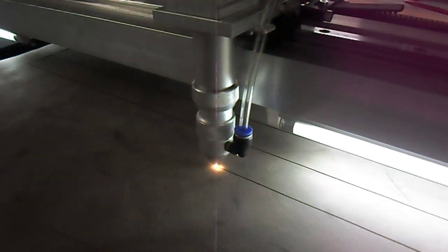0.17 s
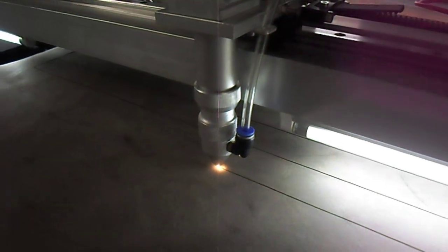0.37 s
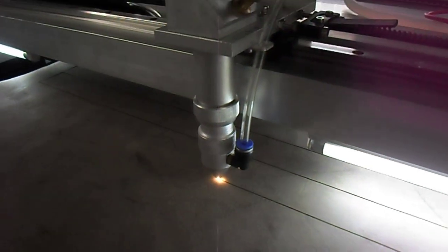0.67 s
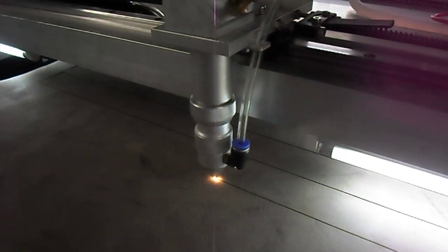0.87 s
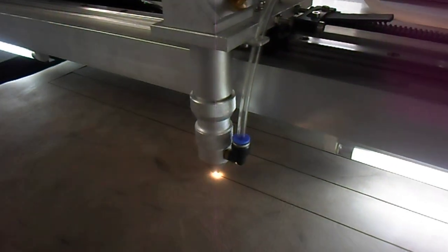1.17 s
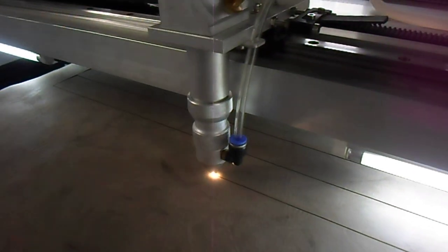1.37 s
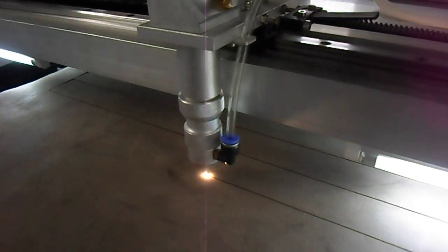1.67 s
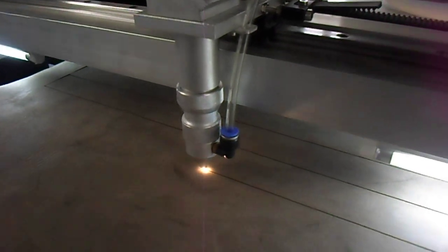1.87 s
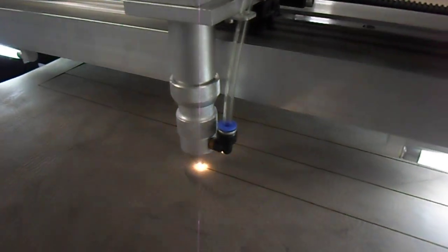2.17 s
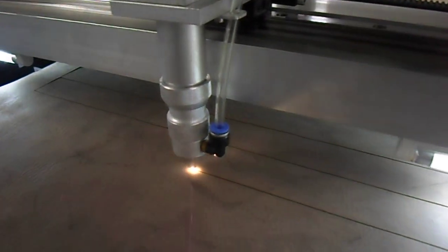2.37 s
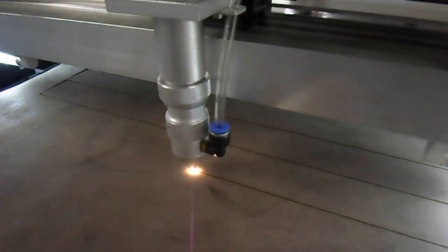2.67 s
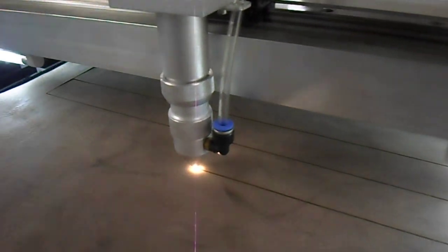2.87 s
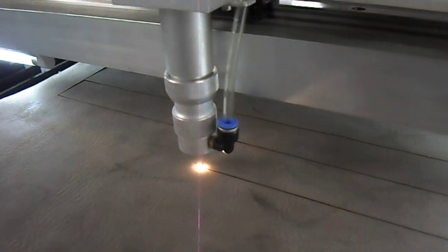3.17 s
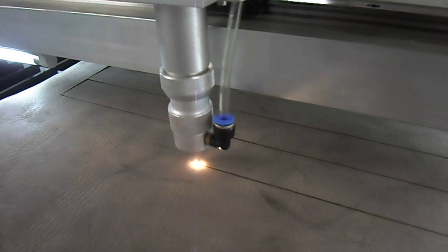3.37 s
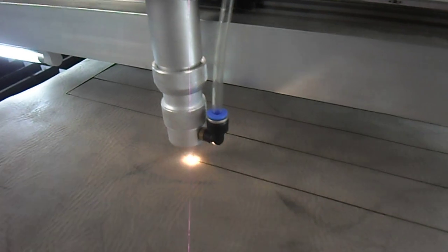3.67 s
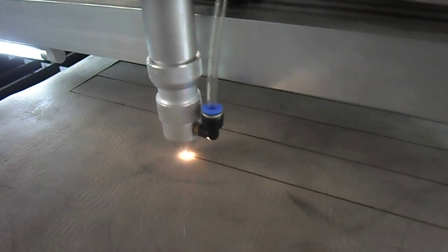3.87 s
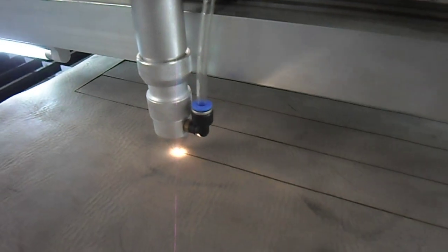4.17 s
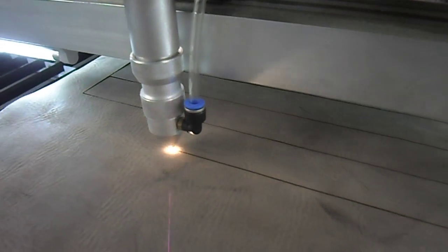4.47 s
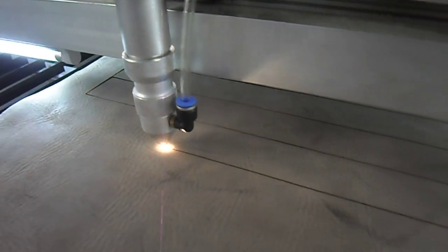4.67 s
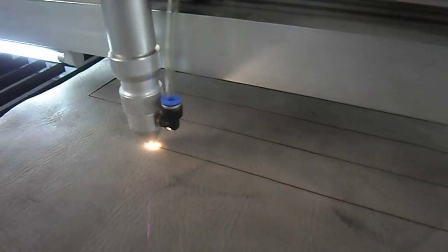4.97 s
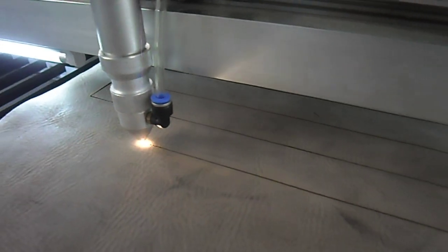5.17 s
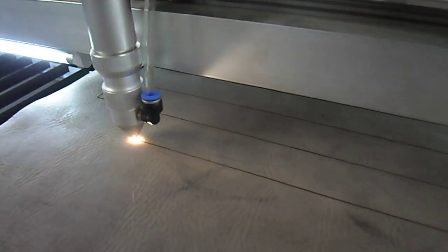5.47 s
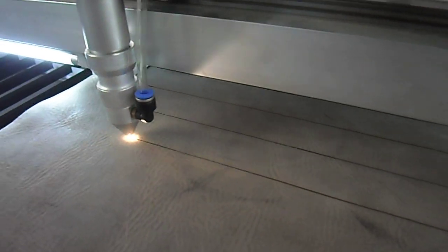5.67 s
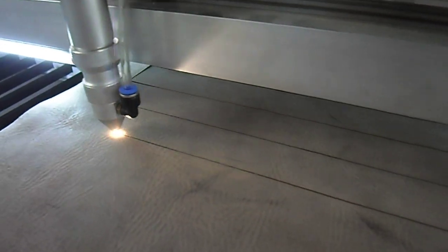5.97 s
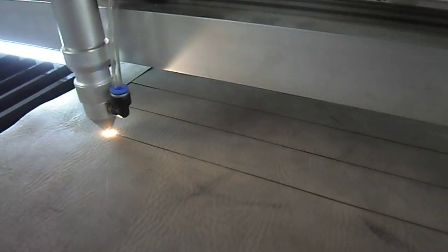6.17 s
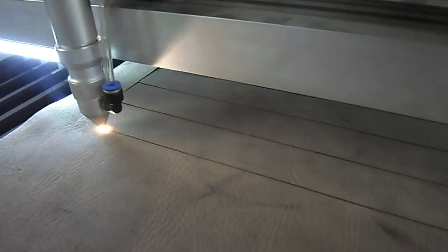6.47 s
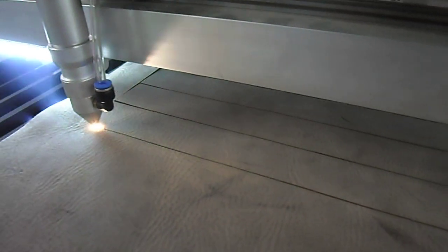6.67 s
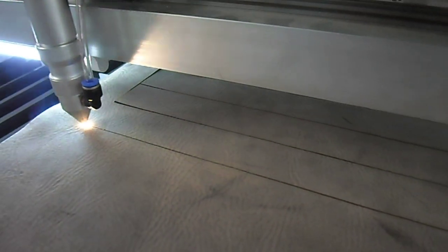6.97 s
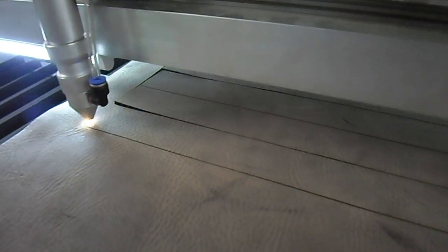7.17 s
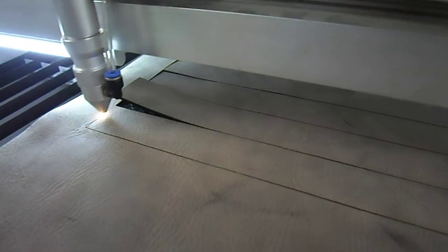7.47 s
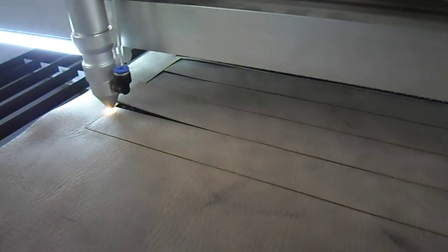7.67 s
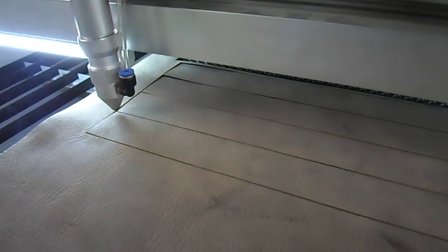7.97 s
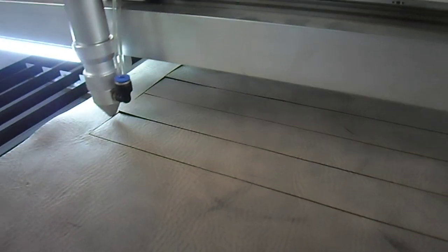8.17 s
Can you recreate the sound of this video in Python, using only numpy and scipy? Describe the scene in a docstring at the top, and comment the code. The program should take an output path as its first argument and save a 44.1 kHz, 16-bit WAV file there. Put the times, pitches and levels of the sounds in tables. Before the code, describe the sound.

A laser cutter's nozzle hisses steadily with a breathy high whistle while leather sizzles and crackles under the beam. Beneath it run a humming motor, a chattering pump and a droning exhaust fan. Near the end the carriage jolts and rattles lightly, air spits in short bursts, and the sizzle stops for a moment before resuming. The sound is mono, picked up close to the machine.

```python
"""A laser cutter burns a line through leather, close to a hand-held mono camera.
From the start the nozzle hisses and the burn sizzles over a stepper's hum, a chattering pump
and a droning exhaust fan. The hiss changes colour as the head travels down the rail.
At 7.3 s the gantry brakes with a jolt, then rattles across the strip while air spits at the cut edges.
Near 7.9 s the beam goes off and the sizzle stops; by 8.3 s stepper and beam have set off again."""
import sys
import numpy as np
from scipy.fft import rfft, irfft, next_fast_len
from scipy.io import wavfile
from scipy.ndimage import map_coordinates

SR = 44100
rng = np.random.default_rng(int(sys.argv[2]) if len(sys.argv) > 2 else 0)


def master(y):
    """Save y as 16-bit WAV."""
    cut = np.clip(np.atleast_2d(y).T, -1, 1)
    pcm = np.round(cut * 32767)  # scale
    wavfile.write(sys.argv[1], SR, pcm.astype(np.int16))


N = 366902
T = np.arange(N) / SR
LONG_CUT_END_S = 7.34  # the head reaches the corner


def air_jet(place, idle):
    """Turbulent hiss, with a breathy whistle in the nozzle; both ease while the beam is off."""
    # hiss colour at the start, middle and end of the rail: f/Hz, relative level/dB
    start_colour = [(1000, -68), (2600, -17), (3000, -10), (3400, -7.5), (3700, -14.5), (4100, -11),
                    (4450, -11.5), (6400, -7.5), (7550, -3.5), (8400, -7), (9500, 0.5), (10000, 2),
                    (10450, -2.5), (11025, -17)]
    middle_colour = [(1000, -45), (2550, -20), (3200, -10), (4200, -17), (4500, -13), (5100, -16),
                     (5400, -10), (6400, -10), (7800, -6.5), (8600, -8), (9700, -0.5), (10350, 0.0),
                     (10700, -7), (11025, -19)]
    end_colour = [(1000, -37), (2750, -24), (3200, -18), (3750, -14.5), (4050, -18.5), (5050, -15.5),
                  (5300, -18), (5550, -17.5), (7300, -14), (8000, -6.5), (9200, -5.5), (9950, -1),
                  (10400, -7), (11025, -24.5)]
    hiss = sum(np.sqrt(np.clip(1 - abs(place - k), 0, 1)) * noise(colour)  # equal-power crossfade
               for k, colour in enumerate([start_colour, middle_colour, end_colour]))
    hiss_db = -24 - 0.4 * idle
    whistle_db = -33.5 + 0.58 * T - 16 * idle
    whistle = resonance(9970, width_hz=480) * amp(whistle_db + 1.34 * wobble(14))
    flutter_db = 0.5 * wobble(7.3) + 0.19 * wobble(30) + 0.68 * wobble(400)
    return hiss * amp(hiss_db + flutter_db) + whistle


def burn(place, idle, crossing):
    """Leather boils away under the beam in a fine, uneven sizzle; now and then a fibre pops."""
    # sizzle colour: f/Hz, relative level/dB
    colour = [(150, -44), (450, -2), (600, 1), (1000, 4.5), (1500, 0.5), (1900, -0.5), (2300, 3),
              (2650, -2.5), (5000, -1.5), (12000, -21)]
    sizzle = noise(colour) * amp(-39.5 + 1.34 * wobble(60))
    pops_per_s, low_cut_hz = 14, 2500
    pops = (rng.random(N) < pops_per_s / SR) * rng.uniform(-0.78, 1, N)
    crackle = amp(-14) * filtered(pops, lambda hz: hz ** 2 / (hz ** 2 + low_cut_hz ** 2))
    gain_db = 0.6 - 2.04 * place + 2 * crossing  # sinks along the rail, lifts in the cross cut
    return (1 - idle) * amp(gain_db) * (sizzle + crackle)


def spits():
    """The jet flares as it crosses the edges of the loosened strip."""
    # spits of air: t/s, level/dB, half length/s
    edges = [(7.295, -30, 0.061), (7.685, -29.5, 0.046), (7.906, -27, 0.01), (8.263, -29, 0.015),
             (8.315, -31, .012)]
    # their colour: f/Hz, relative level/dB
    colour = [(1000, -30), (2800, -10), (3800, -3), (6000, -7), (8000, -1), (12000, -7)]
    flare = sum(amp(db) * swell(at_s, half_s) for at_s, db, half_s in edges)
    return flare * noise(colour) * amp(1.1 * wobble(90))


def hollows():
    """The jet rings hollows of the cabinet as it passes them."""
    # cabinet resonances: f/Hz, width/Hz, level/dB, loudest at t/s, half length/s
    rings = [(5320, 130, -46.5, 4.9, 1.2), (3706, 210, -46, 7.26, 0.56)]
    return sum(amp(db) * swell(at_s, half_s) * resonance(hz, width_hz)
               for hz, width_hz, db, at_s, half_s in rings)


def cabinet(x):
    """Metal walls return the hiss with delays that slide as the head moves."""
    # wall echoes: delay at the start/ms, delay at the end/ms, gain
    walls = [(1.1, 1.7, 0.04), (2.7, 2.1, 0.04), (4.6, 5.3, 0.1), (7.9, 7.1, 0.053)]
    echoes = np.zeros(N)
    for first_ms, last_ms, gain in walls:
        delay_s = np.linspace(first_ms, last_ms, N) / 1000
        echoes += gain * map_coordinates(x, [(T - delay_s) * SR], order=3)
    return x + echoes


def pump(place):
    """The same chatter comes round with every turn of the shaft; a few orders stand out."""
    # strong shaft orders: multiple, rms level/dB at the start, middle and end of the rail
    strong = [(1, -57, -62, -61), (3, -52, -53, -54), (4, -54, -55, -56), (6, -61, -62, -61),
              (9, -64, -63, -64), (10, -64, -64, -63), (15, -64, -62, -62), (16, -57, -62, -60),
              (19, -67, -66, -65), (40, -52.5, -56.5, -63), (43, -57, -68, -70), (44, -63, -59, -58),
              (45, -63, -60, -64), (47, -46, -51.5, -53), (48, -54.5, -56, -56), (49, -60, -62, -64),
              (54, -57, -58, -62), (55, -55.5, -57.5, -59), (63, -63, -60, -69), (84, -63, -61, -60)]
    # chatter colour: f/Hz, relative level per order/dB
    colour = [(60, -22), (150, -1.5), (400, -6), (650, -4), (900, 1.5), (1400, -0.5), (2000, -6.5),
              (3000, -24)]
    shaft_hz, turn_samples = 17.21, 4096
    turns = shaft_hz * T + 0.0019 * wobble(2.03)
    orders = np.arange(turn_samples // 2 + 1)
    weak = (orders < turn_samples // 20) & ~np.isin(orders, [row[0] for row in strong])
    phases = np.exp(2j * np.pi * rng.random(len(orders)))
    order_db = level_at(colour, orders * shaft_hz) + 1.7 * rng.standard_normal(len(orders))
    one_turn = irfft(weak * phases * amp(order_db))
    chatter = unit(np.interp(turns % 1, np.arange(turn_samples) / turn_samples, one_turn, period=1))
    tones = sum(amp(np.interp(place, [0, 1, 2], levels)) * np.sin(2 * np.pi * (k * turns + rng.random()))
                for k, *levels in strong)
    return amp(-46) * chatter + np.sqrt(2) * tones


def stepper():
    """The motor sings at its step rate until the corner, then speeds up into the next line."""
    step = amp(-57.5 + 1.24 * T) * tone(196.2, waver_db=0.8)
    drone = amp(-51.5) * swell(0, half_s=2.2) * tone(208.4, waver_db=0)  # beats with the step and fades
    running = 1 - switch(LONG_CUT_END_S, ramp_s=0.07)
    restart_s, rise_hz_per_s = 8.17, 70
    restart_hz = 100 + rise_hz_per_s * np.maximum(T - restart_s, 0)
    restart = np.sqrt(2) * np.sin(2 * np.pi * np.cumsum(restart_hz) / SR)
    return running * (step + drone) + amp(-50) * switch(restart_s, ramp_s=0.05) * restart


def gantry(crossing):
    """The frame jolts as it brakes and rattles through the short cross cut."""
    # rattle colour: f/Hz, relative level/dB
    colour = [(40, -16), (130, -1), (300, -2), (420, -3), (620, 6), (800, -3), (1200, -8), (2500, -6),
              (5000, -40)]
    shake = amp(-48) * swell(LONG_CUT_END_S, half_s=0.084) + amp(-46) * crossing
    return shake * noise(colour) * amp(1.9 * wobble(25))


def exhaust():
    """The fan draws air through the bed and its motor hums."""
    # hum at the shaft rate, twice that rate and from the mains: f/Hz, rms level/dB
    hum_tones = [(47.1, -56), (94.5, -62), (100, -58.5)]
    # draught colour: f/Hz, relative level/dB
    colour = [(10, 10), (25, 1.5), (55, 9), (80, 1), (200, 3.5), (400, -2), (650, -3), (1100, 0.5),
              (1900, -1.5), (2800, -1.5), (5000, -24)]
    hum = sum(amp(db) * tone(hz, waver_db=3.5) for hz, db in hum_tones)
    return hum + amp(-44) * noise(colour)


def amp(db):
    return 10 ** (np.asarray(db) / 20)


def unit(x):
    return x / np.sqrt(np.mean(x ** 2) + 1e-20)


def level_at(colour, hz):
    """Reads a curve of f/Hz, level/dB points on a log frequency axis."""
    f, db = np.transpose(colour)
    return np.interp(np.log(hz + 1), np.log(f + 1), db)


def wobble(rate):
    """A smooth random curve, rate knots a second."""
    grid = np.arange(0, T[-1] * rate + 1, 0.1)
    knots = rng.standard_normal(int(grid[-1]) + 4)
    return np.interp(T * rate, grid, map_coordinates(knots, [grid]))


def filtered(x, response):
    """Shapes x with a gain that depends on frequency."""
    size = next_fast_len(N + 8192)
    return irfft(rfft(x, size) * response(np.fft.rfftfreq(size, 1 / SR)), size)[..., :N]


def noise(colour):
    """Coloured noise of rms 1."""
    return unit(filtered(rng.standard_normal(N), lambda hz: amp(level_at(colour, hz))))


def resonance(centre_hz, width_hz):
    """A narrow band of noise of rms 1."""
    a, b = filtered(rng.standard_normal((2, N)), lambda hz: 1 / (1 + (2 * hz / width_hz) ** 2))
    phase = 2 * np.pi * centre_hz * T
    return unit(a * np.cos(phase) + b * np.sin(phase))


def tone(hz, waver_db):
    """A sine of rms 1 whose level can waver."""
    return unit(np.sin(2 * np.pi * (hz * T + rng.random())) * amp(waver_db * wobble(4.62)))


def switch(at_s, ramp_s):
    """A ramp from 0 to 1 centred on one moment."""
    return np.clip((T - at_s) / ramp_s + 0.5, 0, 1)


def swell(at_s, half_s):
    """A bell-shaped rise and fall of height 1."""
    return np.exp(-0.5 * ((T - at_s) / half_s) ** 2)


def scene():
    """The head runs down the rail, cuts across the strip, rests its beam and sets off again."""
    # the head's path: t/s, place on the rail (0 start, 1 middle, 2 end)
    travel = [(0, 0), (1.4, 0), (3, 0.72), (4.8, 1.14), (6.4, 1.33)]
    place = np.interp(T, *np.transpose(travel))
    crossing = switch(7.53, ramp_s=0.063) - switch(7.9, ramp_s=0.063)  # 1 during the cross cut
    idle = switch(7.92, ramp_s=0.04) - switch(8.24, ramp_s=0.04)  # 1 while the beam is off
    head = air_jet(place, idle) + burn(place, idle, crossing) + spits() + hollows()
    mono = cabinet(head) + pump(place) + exhaust() + stepper() + gantry(crossing)
    return np.array([mono, mono])


def record(dry):
    """The camera samples at half rate, so the top of the hiss is mirrored, fading, above its band edge."""
    edge_hz, top_hz, fade_db_per_khz = SR / 4, 12380, -23
    sound = filtered(dry, lambda hz: hz < edge_hz)
    flipped = sound * np.cos(np.pi * np.arange(N))  # turns the spectrum upside down
    mirror = filtered(flipped, lambda hz: amp(fade_db_per_khz * abs(hz - edge_hz) / 1000))
    return filtered(sound + mirror, lambda hz: hz < top_hz)


dry = scene()
out = record(dry)
master(out)
```